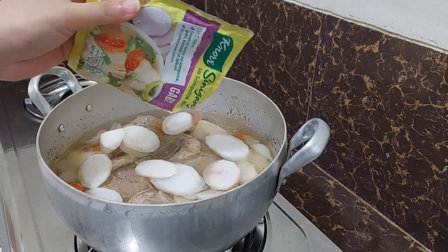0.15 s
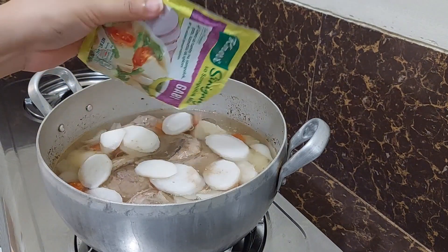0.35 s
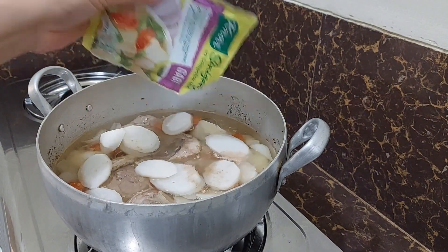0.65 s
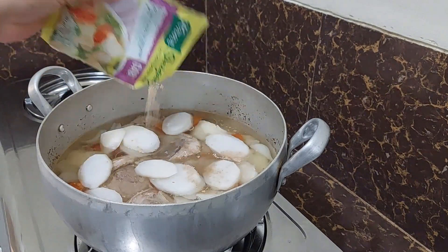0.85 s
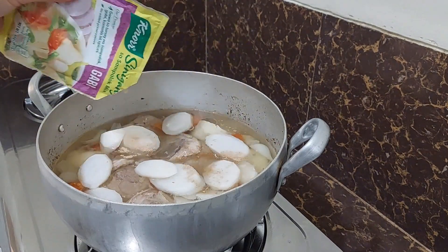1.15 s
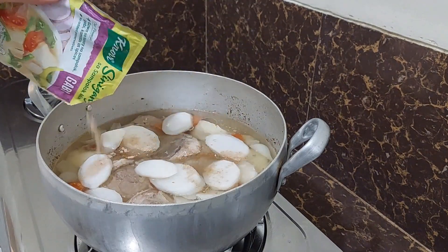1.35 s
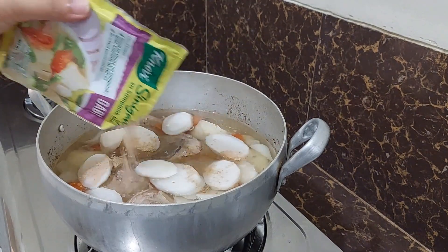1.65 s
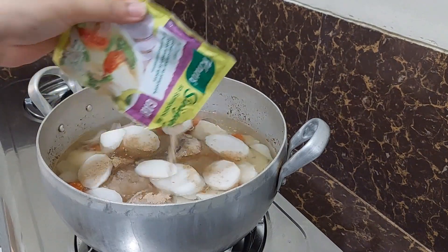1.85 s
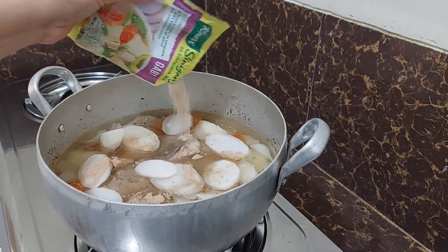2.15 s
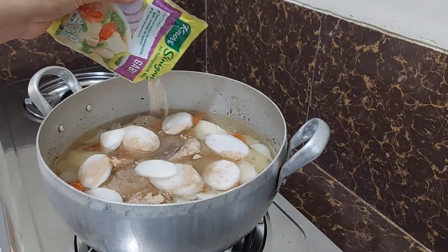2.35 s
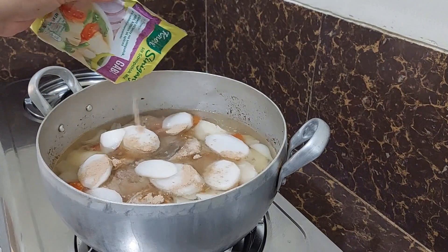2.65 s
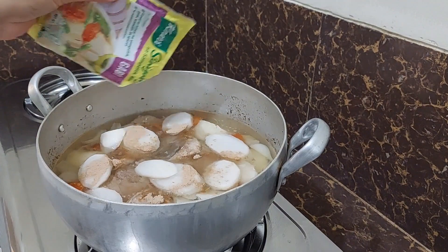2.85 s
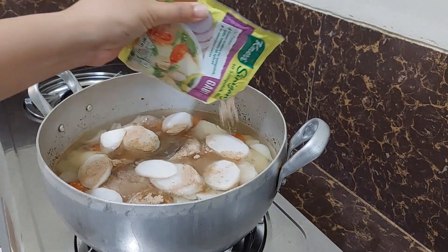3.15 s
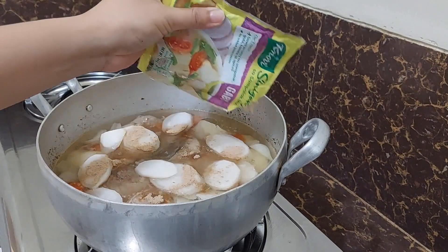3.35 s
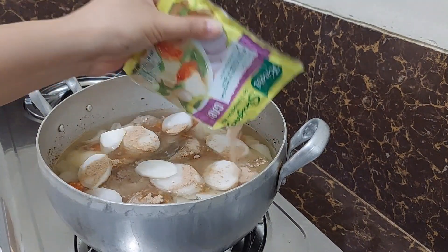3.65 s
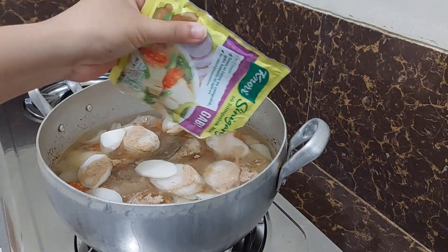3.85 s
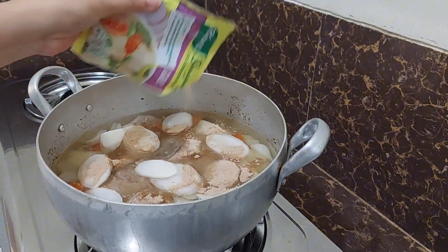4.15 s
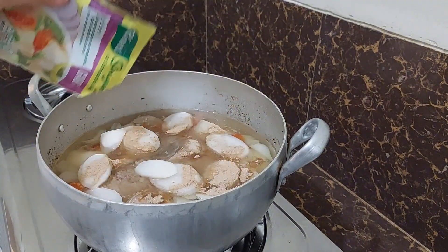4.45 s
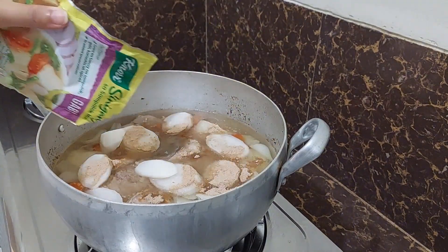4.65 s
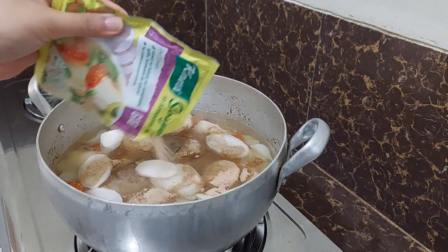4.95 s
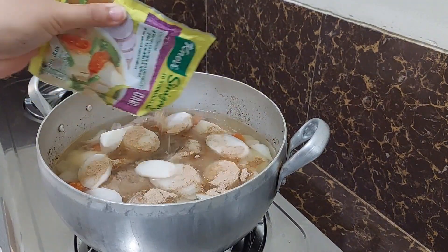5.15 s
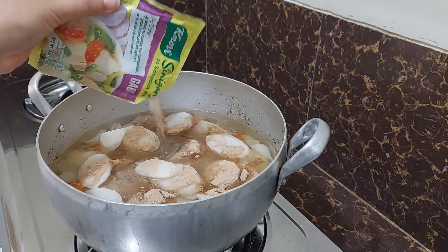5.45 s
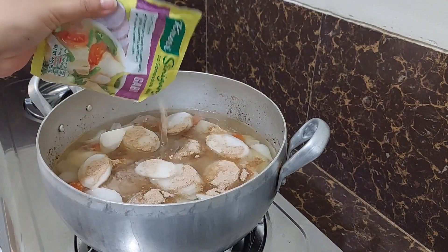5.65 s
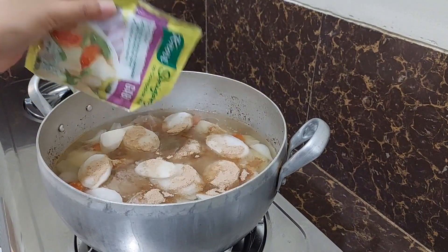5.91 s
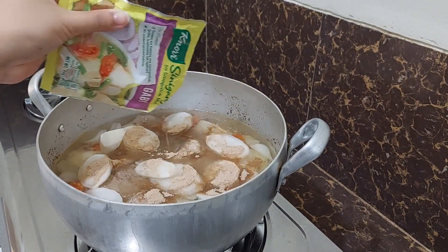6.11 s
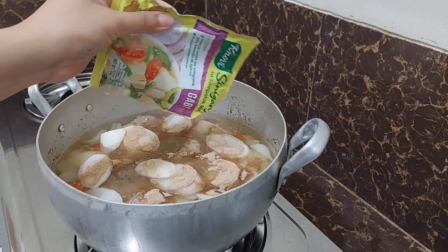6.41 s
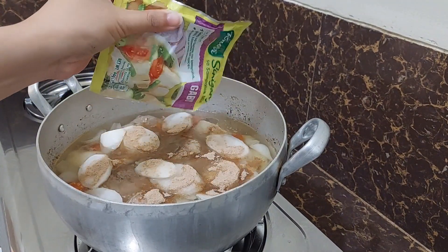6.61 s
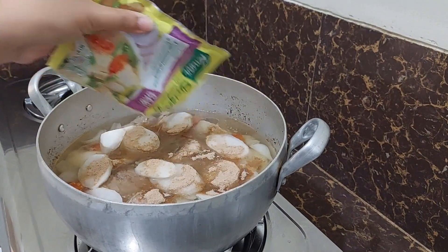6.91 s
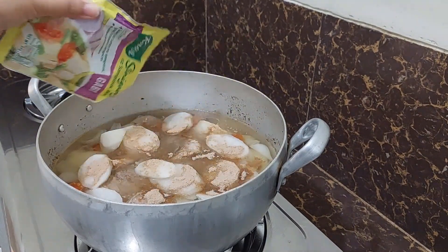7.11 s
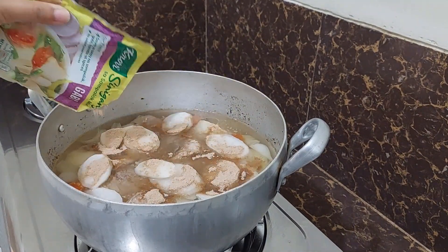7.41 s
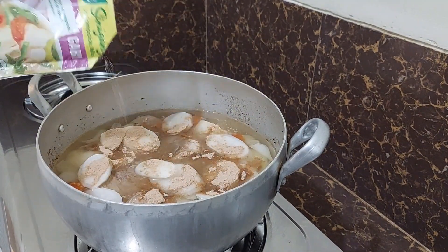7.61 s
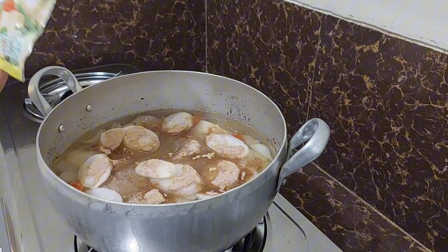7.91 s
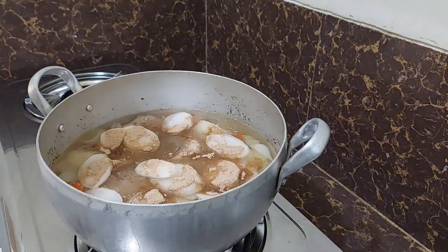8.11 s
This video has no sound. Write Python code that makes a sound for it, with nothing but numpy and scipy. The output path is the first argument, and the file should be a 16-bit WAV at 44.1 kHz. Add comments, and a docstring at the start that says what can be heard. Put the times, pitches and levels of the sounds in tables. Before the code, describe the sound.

A foil sachet of powder is shaken close to a stereo microphone in a small tiled kitchen. From 0 to 0.5 s come quick crinkles and a short sandy swish, then a near pause until about 0.95 s. From 1 to 3.6 s irregular shakes follow, roughly five a second, each a swelling grainy hiss with crisp foil snaps, little panel pops and occasional faint low hollow thuds; a sharp snap lands near 3.0 s. From 3.7 to 4.5 s there are only faint rustles. Shaking resumes at 4.5 s, busier and brighter, loudest from 6.1 to 7.3 s, with hard cracks near 6.1, 6.5 and 6.9 s and a longer swish at 7.2 s. After 7.4 s it fades to dull finger taps, a light rustle at 7.86 s and a thin high hiss over the low, wavering room murmur.

```python
"""Seasoning sachet over a soup pot

A foil sachet of seasoning powder is shaken over a soup pot in a small tiled kitchen, close to a stereo microphone.
At each shake shaped noise and ticks make the powder hiss along the foil, and bursts of noise snap its creases over.
Panels buckle with short clusters of decaying sines, and the firmer jolts set off a low hollow ring.
Pot and wall tiles throw the sachet's sounds back; behind lies the wavering murmur of the room."""
import sys
import numpy as np
from scipy import signal
from scipy.fft import rfft, irfft
from scipy.io import wavfile
from scipy.ndimage import uniform_filter1d

SR = 44100
rng = np.random.default_rng(int(sys.argv[2]) if len(sys.argv) > 2 else 0)


def store_pcm(level_fs):
    """Save levels as 16-bit WAV."""
    pcm = np.round(np.clip(level_fs, -1, 1) * 32767).astype(np.int16)
    wavfile.write(sys.argv[1], SR, np.atleast_2d(pcm).T)


N = 364707  # length [samples]

# strokes of the hand that shakes the sachet:
# (start [s], time until the powder slides fastest [s], level [dB], body [dB], treble [dB])
STROKES = [(0, 0.0024, -38, 5.5, 1), (.11, 0.092, -36.5, 0, 0.5), (0.234, 0.017, -43, -3, -3),
           (0.289, 0.017, -46, 2.5, -2), (.39, 0.013, -43, 1.5, -1.5), (0.454, 0.013, -45.5, 3, 2.5),
           (.57, 0.027, -65, -9, 8), (.88, 0.029, -59.5, -1, 1.5), (0.964, 0.029, -43, 0.5, -1),
           (1.165, 0.024, -41, -1, -6), (1.21, 0.034, -40, 3.5, 3.5), (1.333, 0.047, -36.5, 2.5, 0.5),
           (1.43, 0.019, -45.5, 7, -1), (1.625, .03, -58, 3, -2), (1.665, 0.062, -36, 1.5, -4),
           (1.861, 0.025, -36.5, 2, 2.5), (1.975, 0.016, -48, 5, 5.5), (2.079, 0.076, -38.5, 5.5, -5),
           (2.298, 0.04, -35, 0, 0.5), (2.491, 0.051, -38.5, 7, -1), (2.7, 0.037, -35.5, 1, 2.5),
           (2.901, 0.042, -37.5, 4, -1), (3.09, 0.063, -36, 2.5, 5), (3.32, 0.052, -39, 4.5, -3),
           (3.499, 0.033, -52, 7.5, -5), (3.584, 0.032, -39, 0, 2), (3.73, 0.038, -58.5, -6, 1),
           (3.82, 0.026, -57, 1, 2.5), (3.885, 0.03, -57, -2, 3.5), (3.99, .03, -69.5, -10, 7),
           (4.126, 0.049, -56.5, 7.5, 2.5), (4.51, 0.031, -42, 0, 0.5), (4.605, 0.022, -43, 4, -6),
           (4.679, 0.016, -38.5, 3, -8), (4.778, 0.0482, -34.5, 1.5, -5), (4.951, 0.053, -38.5, 5, 1.5),
           (5.156, .02, -48.5, 6, -6), (5.19, 0.026, -37, 3, -0.5), (5.359, 0.021, -44, 3.5, 1),
           (5.44, .015, -42, 3, -1), (5.612, 0.016, -52, 3, -8), (5.664, 0.024, -42.5, 4, 4.5),
           (5.896, 0.059, -39.5, 5, -2), (6.03, 0.036, -46, 3, -5), (6.105, 0.02, -44, 6.5, 3),
           (6.21, 0.024, -41, 5.5, -13), (6.262, 0.0423, -31, 2, -1), (6.417, 0.016, -42, 3, -6),
           (6.455, 0.03, -33, 4, 0.5), (6.51, 0.013, -42, -2, -9), (6.65, 0.023, -36.5, 3, -6.5),
           (6.715, 0.02, -32, -0.5, -3.5), (6.87, 0.035, -34.5, 2, -3.5), (6.956, 0.035, -34, 2.5, -2),
           (7.03, 0.045, -41.5, 6, -9), (7.115, 0.028, -37.5, 1, -2), (7.165, 0.095, -33, -0.5, 0),
           (7.37, 0.029, -45, 0.5, -10), (7.858, 0.027, -62, -11, 7)]


def gain_of(db):
    """Decibels to amplitude."""
    return 10 ** (np.asarray(db) / 20)


def evened(x):
    """Scales to an rms of 1."""
    return x / np.sqrt(np.mean(x ** 2) + 1e-20)


def read(points, hz):
    """Joins the points by straight lines on a log-frequency axis."""
    f, value = np.transpose(points)
    return np.interp(np.log(hz + 1), np.log(f + 1), value)


def add(mix, s, sound):
    """Mixes a sound in at time s, cut to fit."""
    start = round(s * SR)
    sound = sound[..., max(-start, 0):]
    part = mix[..., max(start, 0):][..., :sound.shape[-1]]
    part += sound[..., :part.shape[-1]]


def causal(points, size=2048):
    """The shortest (minimum-phase) impulse response with the given dB spectrum."""
    hz = abs(np.fft.fftfreq(size, 1 / SR))
    log_gain = np.log(gain_of(read(points, hz)))
    spectrum = np.exp(np.conj(signal.hilbert(log_gain)))
    return np.fft.ifft(spectrum).real[:size // 2]


def convolve(x, response):
    """Filters each channel by its response."""
    return signal.fftconvolve(np.atleast_2d(x), np.atleast_2d(response), axes=1)


def tinted(x, body_db, treble_db, body_hz=900, middle_hz=2400, treble_hz=8500):
    """Broad flexing of the foil adds body; small creases and fine grains add treble."""
    tint = [(body_hz, body_db), (middle_hz, 0), (4600, 0.042 * treble_db), (treble_hz, treble_db)]
    return convolve(x, causal(tint, size=256))


def nearby(x, bounce_db, spread_s=0.0032, lead_s=.00015, count=24):
    """Direct sound, left channel first, and bounces off pot and tiles that change as the sachet moves."""
    response = np.zeros((2, SR // 40))
    delay = np.minimum(.0002 + rng.exponential(spread_s, (2, count)), .02)
    height = rng.standard_normal((2, count)) * np.exp(-delay / (2 * spread_s))
    height *= gain_of(bounce_db) / np.linalg.norm(height, axis=1, keepdims=True)
    np.put_along_axis(response, (delay * SR).astype(int), height, 1)
    response[0, 0] += 1
    response[1, round(lead_s * SR * rng.uniform(.5, 1.6))] += 1
    return convolve(x, response / np.linalg.norm(response, axis=1, keepdims=True))


def powder_streams(count, grains_per_s=1100, grain_spread_db=3.6, grain_share=0.34):
    """Streams of noise for the fine powder, with sparse ticks of uneven size for the coarser grains."""
    size = gain_of(grain_spread_db * np.minimum(rng.exponential(1, (count, N)), 4))
    present = rng.random((count, N)) < grains_per_s / count / SR
    grains = evened(size * rng.choice([-1, 1], (count, N)) * present)
    powder = rng.standard_normal((count, N))
    return np.sqrt(grain_share) * grains + np.sqrt(1 - grain_share) * powder


def flexing(t, after, attack_s=0.0028, release_s=0.046, tighten_db=-11, tighten_s=.018):
    """The foil tightens faintly just before a stroke and flexes for as long as the hand pushes."""
    tighten = gain_of(tighten_db) * np.exp(np.minimum(t, 0) / tighten_s)
    return (np.clip(t / attack_s, 0, 1) + tighten) * np.exp(-after / release_s)


def sliding(length, before, after, rise_s=0.0095, rise_share=0.22, steepness=1.44,
            settle_s=0.021, trickle_db=-24.5, trickle_s=0.16):
    """The powder gathers speed through the stroke, settles, and a little trickles after it."""
    rise = np.exp(-(before / (rise_s + rise_share * length)) ** steepness)
    return rise * (np.exp(-after / settle_s) + gain_of(trickle_db) * np.exp(-after / trickle_s))


def slides(flex_db=-7.5, flex_body_db=0.5, flex_treble_db=-6.5, count=4):
    """In each stroke the foil flexes with a dull rustle, and powder and grains slide at several places on it."""
    out = np.zeros((2, N))
    # the first stream is the foil's rustle; the others, one per place, share the level of the hiss
    streams = powder_streams(count) / np.sqrt(count - 1)
    for s, length, db, body_db, treble_db in STROKES:
        at = np.arange(max(round(s * SR) - SR // 12, 0), min(round(s * SR) + SR // 2, N))
        t = at / SR - s
        rustle, *hisses = streams[:, at]
        before, after = np.maximum(length - t, 0), np.maximum(t - length, 0)
        flex = gain_of(db + flex_db) * flexing(t, after)
        swell = gain_of(db) * sliding(length, before, after)
        places = sum(nearby(swell * hiss, bounce_db=3.5, spread_s=.0022) for hiss in hisses)
        add(out, at[0] / SR, tinted(places, body_db, treble_db))
        foil = nearby(flex * rustle, bounce_db=1.0)
        add(out, at[0] / SR, tinted(foil, body_db + flex_body_db, treble_db + flex_treble_db))
    return out


def snaps(shiver_s=0.011, shiver_db=-21, level_db=-.5, bass_hz=200):
    """A crease runs across the foil in a burst of tiny cracks, and the sheet shivers for a moment."""
    # the loudest creases snapping over: (time [s], level as if packed into one millisecond,
    # ahead of the common level_db [dB], running time [s], body [dB], treble [dB])
    loud_creases = [(.11, -33, 0.0022, 4.5, -4), (.1281, -35.5, 0.00089, 11.5, 0.5),
                    (.1576, -37.5, 0.0025, 15.5, -5), (0.2414, -23, 0.0022, -1, -3.5),
                    (0.4, -28.5, .0007, 1.5, 5.5), (0.4645, -31, 0.0016, 4, 4.5), (0.9755, -35, .003, 5, 0),
                    (0.9923, -31, .001, -2, -16), (1.2, -27, 0.0022, 0.5, -4), (1.434, -29, .0013, 4, 1.5),
                    (1.622, -40, .001, 4, -1), (1.6661, -30.5, .002, 9, 0.5), (1.7284, -24.5, 0.0022, 7, 2),
                    (1.863, -30, .0012, 5, 5.5), (1.9772, -24.5, 0.0025, 2.5, 0.5),
                    (2.1292, -22.5, 0.00097, -4, 1), (2.165, -33, .001, -7, 10.5),
                    (2.238, -28.5, .0008, -1, -10.5), (2.303, -33, .0014, 3, -4),
                    (2.3658, -26, 0.0019, 7, 4), (2.5656, -24.5, .0014, -4, -1.5),
                    (2.7047, -37, 0.0022, 4, 7.5), (2.9897, -19.5, 0.00071, 5, -1),
                    (3.3267, -35, 0.0018, -3, 0), (3.3648, -22.5, 0.0041, 4, 2.5),
                    (3.5405, -34.5, .004, -1, 2), (3.5907, -23.5, .0007, 2.5, 4),
                    (3.8935, -42, .0013, 2, -13), (4.0867, -50, .004, 8, 2),
                    (4.1282, -43.5, 0.0044, -2.5, -5), (4.6099, -27.5, 0.0016, -16, -5),
                    (4.6872, -23.5, 0.0022, 5, 1), (4.7803, -27, .0015, 4, -3.5),
                    (4.8259, -22.5, .0009, 4, 6), (4.971, -28.5, .0008, -8, 3.5),
                    (4.996, -20.5, .001, -1.5, 7), (5.2172, -33, 0.00097, 3, 13.5),
                    (5.3603, -35.5, 0.00063, -15, 5), (5.4472, -28, 0.00082, 6.5, 7.5),
                    (5.6707, -25.5, 0.0029, 4.5, 0.5), (5.8589, -45, 0.00081, 8, 3),
                    (5.898, -35.5, .0016, -19, 5), (5.9452, -25, .001, -3, 1.5),
                    (6.0532, -23, .0014, 7.5, 3), (6.1191, -16.5, .0006, -28, -0.5),
                    (6.2684, -23.5, .007, 11, -9), (6.3145, -32.5, .0008, -20, 15),
                    (6.4764, -12.5, 0.00046, -27, -5.5), (6.6156, -29.5, 0.0013, 0, 2),
                    (6.7204, -20, .0014, 4, 0.5), (6.7315, -22.5, 0.00083, 1, -16),
                    (6.8404, -34.5, .0016, 6, 1), (6.8935, -18, 0.00083, -2, 2),
                    (6.9623, -23, 0.00077, 0.5, 3.5), (7.003, -25, 0.004, -3, -1),
                    (7.0275, -34, .002, 11, 10), (7.119, -32, 0.0031, 7, 1), (7.2172, -22.5, .0016, 9, 3),
                    (7.374, -32, .001, -3.5, 1), (7.5058, -39.5, 0.00068, 2.5, 0),
                    (7.861, -44, 0.0022, -6, -1), (8.01, -53, .0003, -12, 12)]
    out, t = np.zeros((2, N)), np.arange(768) / SR
    for s, db, running_s, body_db, treble_db in loud_creases + crinkles():
        fade = np.exp(-t / running_s) + gain_of(shiver_db) * np.exp(-t / shiver_s)
        z = rfft(fade * rng.standard_normal(len(t)), 2 * len(t))
        z /= np.sqrt(uniform_filter1d(abs(z) ** 2, size=21))  # an even spectrum
        crack = irfft(z)[:len(t)]
        crack *= gain_of(db) * np.sqrt(SR / 1000) / np.linalg.norm(crack)
        add(out, s, nearby(tinted(crack, body_db, treble_db), bounce_db=-1.5, spread_s=.0022))
    # a small crease radiates little bass
    highpass = signal.butter(1, bass_hz, "high", fs=SR, output="sos")
    return gain_of(level_db) * signal.sosfilt(highpass, out)


def crinkles(per_s=80, level_db=-1.5, spread_db=2.5, build_db_per_s=118, after_s=.03,
             running_s=.0007, body_db=1, count=16):
    """Small creases give way at random in every stroke, hardest when the powder slides fastest."""
    rows = []
    for s, length, db, _, treble_db in STROKES:
        times = np.cumsum(rng.exponential(1 / per_s, count))
        crest = db + level_db - build_db_per_s * abs(times - length)
        levels = crest + spread_db * rng.standard_normal(count)
        for t, level in zip(times, levels):
            if t < length + after_s:
                rows.append((s + t, level, running_s, body_db, treble_db))
    return rows


def buckles(scatter=0.24, level_db=-3, edge_damping=1.0, count=14):
    """A panel pops through and rings briefly in a broad cluster of modes, the outer ones dying first."""
    # whole panels of the sachet buckling with a pitch of their own:
    # (time [s], level ahead of the common level_db [dB], middle of the cluster [Hz],
    # t60 of a mode halfway out in the cluster [s])
    panels = [(1.68, -51, 780, 0.12), (2.13, -44.5, 580, 0.087), (2.99, -37, 700, 0.026),
              (3.365, -43, 1040, 0.047), (3.848, -61, 1050, .08), (3.893, -67, 1027, .1),
              (4.169, -73, 990, .06), (5.002, -48, 363, 0.17), (5.945, -41.5, 537, .08),
              (6.12, -36.5, 810, 0.06), (6.615, -39, 713, .045), (6.894, -30, 1820, 0.044),
              (7.002, -45, 518, 0.25), (7.218, -42.5, 555, 0.13), (7.506, -40.5, 2410, .035)]
    out, t = np.zeros((2, N)), np.arange(SR // 8) / SR
    for s, db, hz, t60 in panels:
        offset = rng.uniform(-0.965, 1, (count, 1))
        fade = gain_of(-60 * t / t60 * (0.5 + edge_damping * abs(offset)))
        phase = hz * (1 + scatter * offset) * t + rng.random((count, 1))
        ring = (fade * np.sin(2 * np.pi * phase)).sum(0)
        ring *= np.linalg.norm(fade[0]) / np.linalg.norm(ring)
        onset = np.minimum(t * 1000, 1)  # one millisecond
        add(out, s, nearby(ring * gain_of(db) * onset, bounce_db=-3))
    return gain_of(level_db) * out


def taps(attack_s=0.0013, release_s=.016):
    """Fingers shift on the emptied sachet: short, dull bursts of rustle."""
    # dull taps of the foil as the grip shifts: (time [s], level [dB])
    grip_shifts = [(7.5063, -53.5), (7.652, -59), (7.713, -59), (7.862, -53), (7.886, -52)]
    # their colour: (frequency [Hz], level per Hz [dB])
    tap_colour = [(300, -23), (1500, -8), (2500, 0.5), (4000, -4), (6000, -13), (12000, -19)]
    out, t = np.zeros((2, N)), np.arange(SR // 8) / SR
    colour = causal(tap_colour)
    colour /= np.linalg.norm(colour)
    for s, db in grip_shifts:
        fade = np.minimum(t / attack_s, 1) * np.exp(-t / release_s)
        burst = gain_of(db) * fade * rng.standard_normal(len(t))
        add(out, s, nearby(convolve(burst, colour), bounce_db=1))
    return out


def thin_hiss(level_db=-1, body_db=-18, treble_db=3):
    """A faint, high hiss of filtered noise from the sachet as it is drawn away."""
    # course of the hiss: (time [s], level ahead of the common level_db [dB])
    course = [(7.84, -91), (7.862, -63), (8.0, -71), (8.008, -61), (8.154, -63.5), (8.27, -65.5)]
    s, db = np.transpose(course)
    level = np.interp(np.arange(N) / SR, s, gain_of(db + level_db), left=0)
    return tinted(level * rng.standard_normal((2, N)), body_db, treble_db)[:, :N]


def hollow(lag_s=0.000083, right_db=-3, detune=0.024, push_s=0.021):
    """Each jolt pushes the air for a moment and leaves a low ring, a little different each time."""
    # jolts that set off the hollow ring: (time [s], relative level [dB])
    jolts = [(0.131, -65), (0.223, -54), (1.187, -58), (1.7, -62), (2.166, -66.5), (2.338, -63.5),
             (2.525, -63), (2.718, -64), (2.905, -61), (4.685, -63.5), (5.64, -65.5), (6.047, -54),
             (6.457, -54.5), (6.899, -58), (7.193, -61.5)]
    # modes of the ring: (frequency before detuning [Hz], relative level [dB], t60 [s])
    modes = [(245, 7.5, 0.43), (360.4, -5.5, 0.51), (126.2, -12, 0.28)]
    out, t = np.zeros((2, N)), np.arange(SR // 2) / SR
    push = 2 * np.sin(np.pi / 2 * np.minimum(t / push_s, 1)) ** 2
    for s, db in jolts:
        stretch = 1 + detune * rng.uniform(-1.3, 1)
        ring = np.zeros(len(t))
        for hz, mode_db, t60 in modes:
            fade = gain_of(mode_db - 60 * t / t60)
            ring += fade * np.sin(2 * np.pi * (hz * stretch * t + rng.random()))
        ring *= gain_of(db) * push
        add(out[0], s, ring)
        add(out[1], s + lag_s, gain_of(right_db) * ring)
    return out


def pot(x):
    """The open pot rings faintly at a few pitches."""
    # what the sachet's sound rings with in the pot: (frequency [Hz], energy [dB], t60 [s])
    pot_modes = [(558, -22, 0.14), (773, -30, 0.09), (862, -25.5, 0.15), (953, -24.5, 0.18),
                 (1477, -22, 0.13), (2330, -26.5, 0.09)]
    t = np.arange(SR // 3) / SR
    response = np.zeros((2, len(t)))
    for hz, db, t60 in pot_modes:
        mode = gain_of(-60 * t / t60) * np.sin(2 * np.pi * (hz * t + rng.random((2, 1))))
        response += gain_of(db) * mode / np.linalg.norm(mode[0])
    return convolve(x, response)[:, :N]


def kitchen(x, gap_s=.004, turns_per_s=11, count=3):
    """Short diffuse tails off the tiles, fed in turn as the sachet moves; each band dies at its own speed."""
    # reverberation of the tiled room: (frequency [Hz], t60 [s])
    decay = [(150, 0.13), (400, 0.16), (1000, 0.28), (2800, 0.27), (7300, 0.27), (15000, 0.18)]
    # strength of the tails: (frequency [Hz], level against the near sound [dB])
    echo = [(150, 2.5), (600, -1.5), (2500, -3.5), (7000, -5), (15000, -4)]
    out = np.zeros((2, N))
    for k in range(count):
        hz, t, z = signal.stft(rng.standard_normal((2, SR // 2)), SR, nperseg=256)
        fade = gain_of(-60 * t / read(decay, hz)[:, None])
        energy = np.mean(fade ** 2, 1, keepdims=True) * (SR // 2)
        fade *= gain_of(read(echo, hz))[:, None] / np.sqrt(energy)
        tail = signal.istft(z * fade, SR, nperseg=256)[1]
        turn = turns_per_s * np.arange(N) / SR + k / count
        feed = np.sqrt(2 / count) * np.cos(2 * np.pi * turn)
        add(out, gap_s, convolve(x * feed, tail))
    return out


def hush(level_db=-69, waver_db=3.5, waver_hz=8, count=24):
    """Low murmur of the room that wavers a little, mostly stronger on the left, under a faint even hiss."""
    # background of the kitchen: (frequency [Hz], relative level per Hz [dB])
    room_colour = [(20, -12), (60, -0.5), (90, -7.5), (125, 3), (170, -10), (260, -2), (500, -16),
                   (1000, -21), (2500, -26.5), (7000, -25.8), (15000, -22.3)]
    # likeness of the two channels: (frequency [Hz], correlation [0 to 1])
    likeness = [(30, .15), (70, 0.093), (125, 0.52), (260, 0.28), (700, 0), (2000, 0.031)]
    # balance of the two channels: (frequency [Hz], left over right [dB])
    balance = [(30, -9), (70, 11.5), (125, 12.5), (300, 6.5), (1000, 2), (10000, -0.5)]
    hz = np.fft.rfftfreq(N, 1 / SR)
    left, other = rfft(rng.standard_normal((2, N)))
    same = np.clip(read(likeness, hz), -1, 1)
    right = same * left + np.sqrt(1 - same ** 2) * other
    lean = gain_of(read(balance, hz) / 2)
    z = np.array([left * lean, right / lean]) * gain_of(read(room_colour, hz))
    low = 1 / (1 + (hz / 500) ** 4)  # share of the murmur; the rest is the even hiss
    t = np.arange(0, N, 256) / SR
    speeds_hz = np.geomspace(1, waver_hz, count)
    drift = evened(sum(np.sin(2 * np.pi * (f * t + rng.random())) for f in speeds_hz))
    waver = gain_of(waver_db * np.interp(np.arange(N) / SR, t, np.tanh(drift)))
    murmur, hiss = waver * irfft(z * low, N), irfft(z * (1 - low), N)
    return gain_of(level_db) * evened(murmur + hiss)


def scene():
    """The sachet sounds into pot and kitchen and reaches two unlike microphone ports; ring and room join in."""
    # colour of the foil, shared by slides, snaps and thin hiss: (frequency [Hz], relative level per Hz [dB])
    foil_colour = [(50, -29), (125, -15.5), (180, -18.5), (330, -10), (430, -13.5), (600, -10.5), (880, -7),
                   (1200, -8.5), (2300, -2.5), (4500, -2.5), (7500, -3), (8600, -8.5), (11500, -1),
                   (15800, -9)]
    # difference between the microphone ports: (frequency [Hz], left over right [dB])
    port_balance = [(300, 5), (700, -1), (1400, 2), (2800, -0.4), (5500, -2), (9500, -0.9), (14000, -0.3)]
    colour = causal(foil_colour)
    foil = convolve(slides() + snaps() + thin_hiss(), colour / np.linalg.norm(colour))[:, :N]
    sachet = foil + buckles() + taps()
    ports = [causal([(hz, side * db / 2) for hz, db in port_balance]) for side in (1, -1)]
    heard = convolve(sachet + pot(sachet) + kitchen(sachet), ports)[:, :N]
    return heard + hollow() + hush()


def record(dry, edge_hz=16050):
    """The recorder's band limit: a steep low-pass."""
    lowpass = signal.firwin(401, edge_hz, window=("kaiser", 8), fs=SR)
    return signal.oaconvolve(dry, lowpass[None], "same")


dry = scene()
out = record(dry)
store_pcm(out)
```